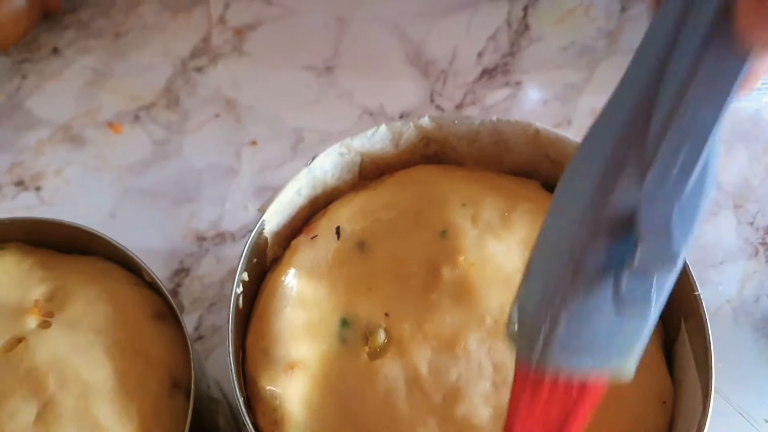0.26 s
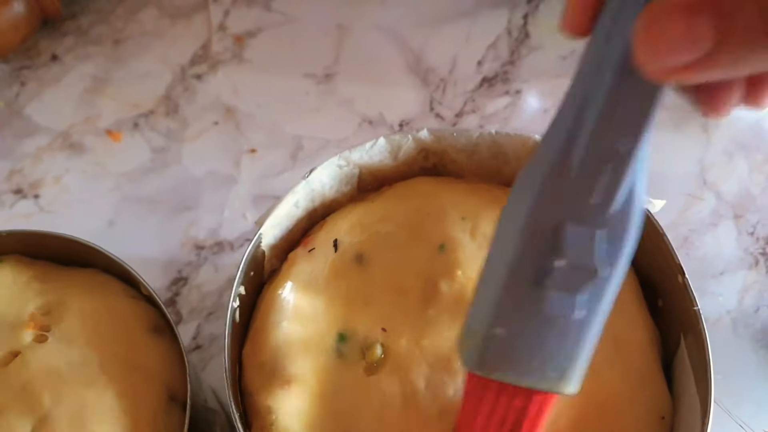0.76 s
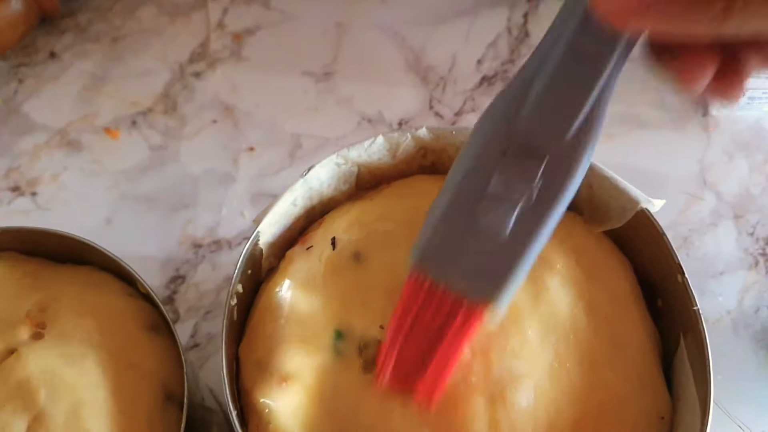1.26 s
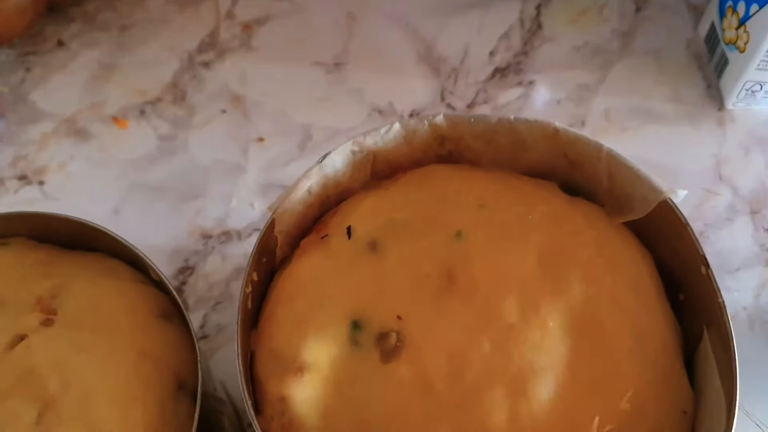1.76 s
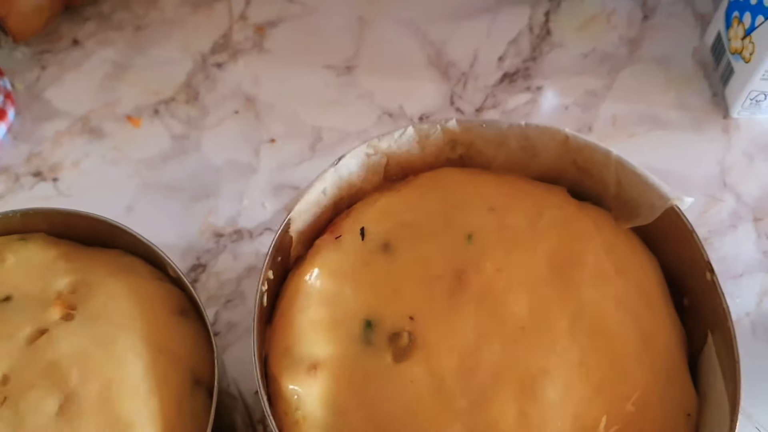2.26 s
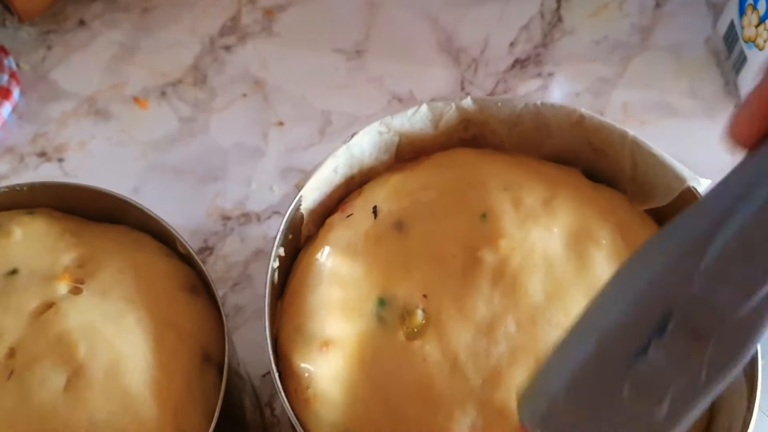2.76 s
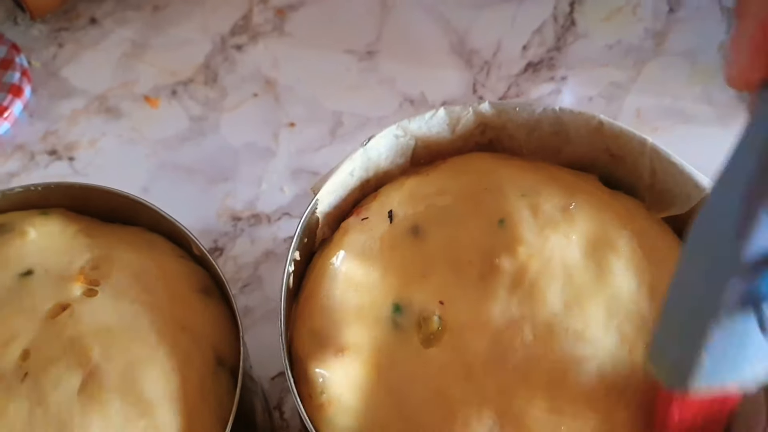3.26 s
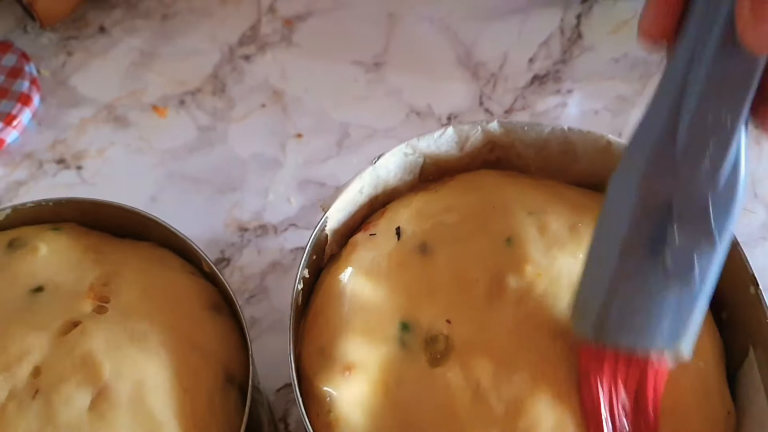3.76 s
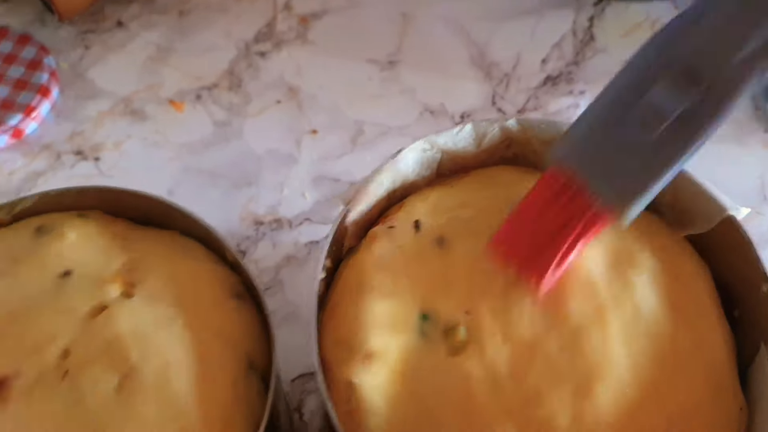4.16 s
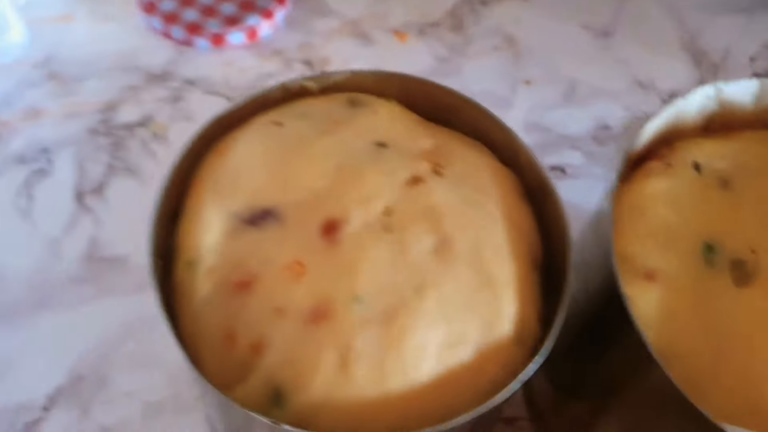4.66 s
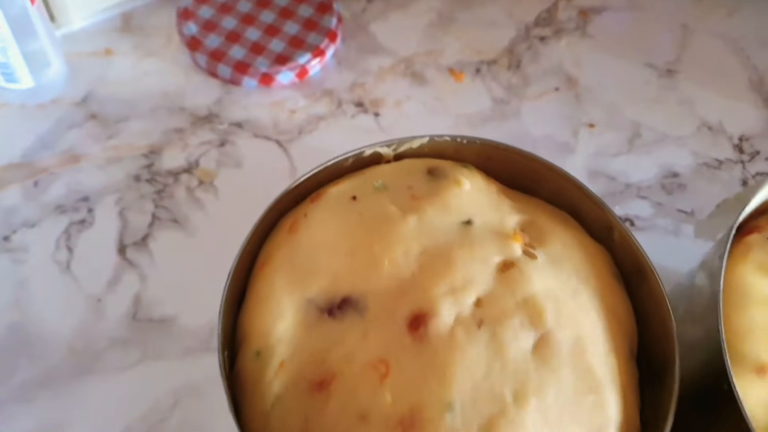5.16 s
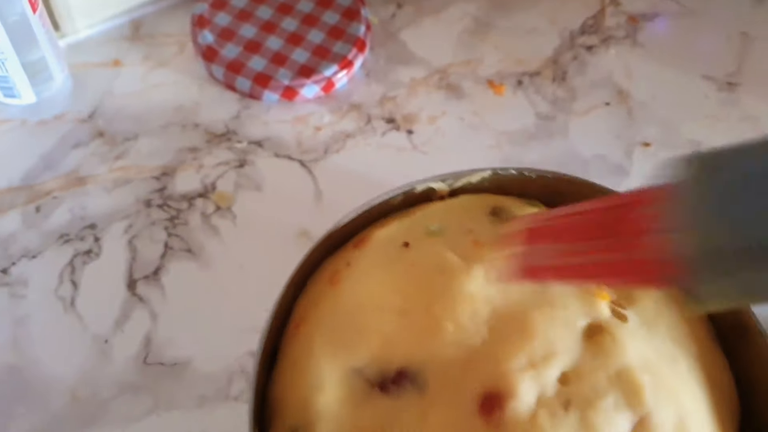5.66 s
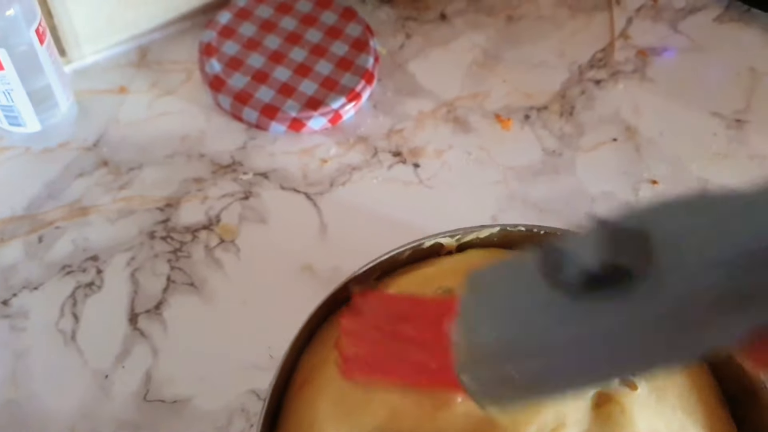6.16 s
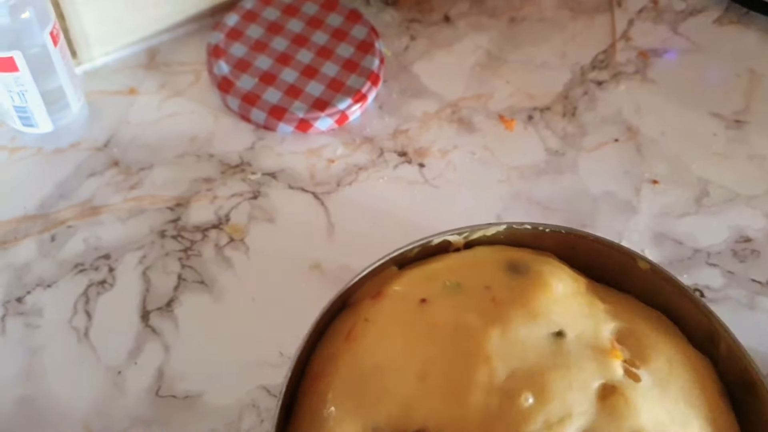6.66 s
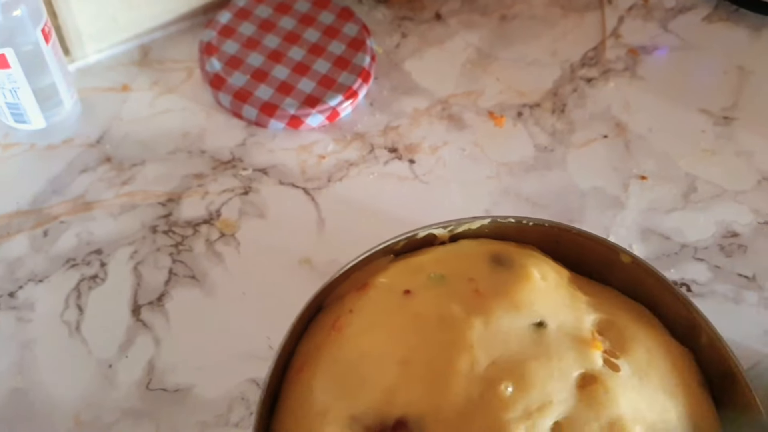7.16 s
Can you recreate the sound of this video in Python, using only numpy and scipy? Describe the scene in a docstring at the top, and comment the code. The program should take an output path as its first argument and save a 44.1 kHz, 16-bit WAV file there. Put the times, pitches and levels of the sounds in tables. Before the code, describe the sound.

A silicone brush swishes and pats in short uneven bursts over a droning kitchen hum, with sticky clicks and a single hard clink midway.

```python
"""In a small kitchen, a silicone brush glazes dough in paper-lined metal baking rings, close to a phone.
Rustling bristles are dense tiny noise clicks, shaped by pressure; taps wake the decaying tones of a ring.
The brush is dipped with wet ticks of resonant noise, and its handle knocks once against the glaze bowl.
Underneath, an appliance hums with sine tones over filtered noise; the hum and casing tones shift in level
once, as the phone moves over to the second ring."""
import sys
import numpy as np
from scipy import signal
from scipy.fft import rfft, irfft
from scipy.io import wavfile
from scipy.ndimage import uniform_filter1d

SR = 44100
rng = np.random.default_rng(int(sys.argv[2]) if len(sys.argv) > 2 else 0)


def store_wav(level_fs):
    """Save 16-bit WAV to argv[1]."""
    pcm = np.round(np.clip(np.atleast_2d(level_fs), -1, 1) * 32767)
    wavfile.write(sys.argv[1], SR, pcm.T.astype(np.int16))


N = 325899
T = np.arange(N) / SR  # time in s
HZ = np.maximum(np.fft.rfftfreq(N, 1 / SR), 1)  # frequencies of the spectrum
HALF_SECOND = SR // 2


def undb(db):
    """Turn decibels into gain."""
    return 10 ** (np.asarray(db) / 20)


def unit(x):
    """Scale to an rms (average strength) of 1."""
    return x / np.sqrt(np.mean(x ** 2))


def sides(pan_db):
    """Left and right gains for a left-minus-right level difference in dB."""
    return undb(np.array([[0.5], [-0.5]]) * pan_db)


def gains(points):
    """Draw a gain curve over all frequencies through (frequency [Hz], level [dB]) points."""
    hz, db = np.transpose(points)
    return undb(np.interp(np.log(HZ), np.log(hz), db))


def colour(x, gain):
    """Filter with a gain curve, without sounding ahead of time; white noise keeps its power."""
    # folding the cepstrum puts each click's energy after the click
    cepstrum = irfft(np.log(unit(gain)), N)
    cepstrum[1:N // 2] *= 2
    cepstrum[N // 2:] = 0
    response = np.exp(rfft(cepstrum))
    return irfft(rfft(x) * response, N)


def decay(t60):
    """Half a second of exponential decay, falling 60 dB in t60 seconds."""
    return np.exp(-np.log(1000) * T[:HALF_SECOND] / t60)


def add(out, s, x):
    """Mix a sound in at time s."""
    i = max(int(s * SR), 0)
    out[:, i:i + x.shape[-1]] += x[..., :N - i]


def burst(t60, tail_db, tail_t60):
    """A noisy crack and its scatter off the worktop, different at each microphone."""
    envelope = decay(t60) + undb(tail_db) * decay(tail_t60)
    return rng.standard_normal((2, HALF_SECOND)) * envelope


def mode(hz, t60, lag=0.00013):
    """One decaying tone of a struck object; it reaches the right microphone lag seconds later."""
    t = np.maximum(T[:HALF_SECOND] - np.array([[0], [lag]]), 0)
    return np.sin(2 * np.pi * hz * t) * decay(t60)


def ports(pair, apart_hz):
    """Two close microphones hear the same bass and, well above apart_hz, unrelated treble."""
    a, b = rfft(pair)
    alike = 1 / (1 + (HZ / apart_hz) ** 2)
    shared = a * np.sqrt((1 + alike) / 2)
    opposed = np.array([[1], [-1]]) * b * np.sqrt((1 - alike) / 2)
    return irfft(shared + opposed, N)


def resonance(x, hz, width_hz):
    """A resonance whose centre glides along the curve hz: shift it to zero, low-pass, shift back."""
    turn = np.exp(2j * np.pi * np.cumsum(hz) / SR)
    low_pass = signal.butter(2, width_hz / 2, fs=SR, output="sos")
    return unit((signal.sosfilt(low_pass, x / turn) * turn).real)


# appliance hum tones: (frequency [Hz], rms level before the overall trim [dB])
HUM_TONES = [(57.3, -54.5), (71.2, -52), (100.1, -48), (116, -68)]
# rumble colour: (frequency [Hz], relative level [dB per Hz])
RUMBLE_COLOUR = [(15, -50), (30, -15), (45, -12.5), (56, 2.5), (65, -5.5), (78, 1.5), (88, -7), (100, -9),
                 (125, -16.5), (200, -23), (320, -28), (600, -29), (1050, -46), (1500, -64.5)]
# hiss colour: (frequency [Hz], relative level [dB per Hz])
HISS_COLOUR = [(600, -3.5), (1500, 4.5), (3000, 5.5), (5000, -5), (6600, -9.5), (7300, -28.5), (11000, -12),
               (15000, -17), (16000, -28)]
# resonances of the appliance casing: (frequency [Hz], width [Hz], peak gain before the overall trim [dB])
CASING_RESONANCES = [(256, 38.3, 9), (358, 23, 1), (381.2, 6.6, 14), (380.4, 22, 12), (444.5, 15, 9),
                     (605, 27.5, 10.5), (698, 23, 7.5)]
# the phone moves over to the second ring
MOVE_S, MOVE_LENGTH_S = 4.23, 0.63
MOVE_CASING_DB, MOVE_HUM_DB = -3.5, 2  # changes of level


def background(rumble_db=-49, casing_db=-0.2, hum_db=-0.74, hiss_db=-78, waver_db=1.5):
    """Motor and mains tones over a rumble that rings the casing, and a faint, slowly wavering hiss."""
    moved = np.clip((T - MOVE_S) / MOVE_LENGTH_S, 0, 1)
    casing = sum((undb(db) - 1) / (1 + (2 * (HZ - hz) / width) ** 2)
                 for hz, width, db in CASING_RESONANCES)
    rumble = unit(colour(ports(rng.standard_normal((2, N)), 600), gains(RUMBLE_COLOUR)))
    casing_ring = irfft(rfft(rumble) * casing, N)
    rumble = rumble + casing_ring * undb(casing_db + MOVE_CASING_DB * moved)

    # root 2 turns an rms level into a sine's peak
    hum = sum(np.sqrt(2) * undb(db) * np.sin(2 * np.pi * (hz * T + rng.random()))
              for hz, db in HUM_TONES)
    hum = hum * undb(hum_db + MOVE_HUM_DB * moved)

    slow_noise = unit(uniform_filter1d(rng.standard_normal(N), size=6000))
    hiss = colour(rng.standard_normal((2, N)), gains(HISS_COLOUR)) * undb(waver_db * slow_noise)
    return undb(rumble_db) * rumble * sides(0.8) + hum * sides(2.4) + undb(hiss_db) * hiss * sides(6.1)


def slips(rate, spread_db):
    """Dense tiny releases of sticking bristles (rate per second), a few larger than the rest."""
    hit = rng.random(N) < rate / SR
    size = undb(spread_db * np.minimum(rng.exponential(size=N), 4))
    return unit(hit * size * rng.standard_normal((2, N)))


# brush strokes: (time of firmest pressure [s], swell [s], fade [s], level [dB],
# treble relative to the level [dB], left minus right [dB], swish pitch [Hz])
BRUSH_STROKES = [ (0.021, 0.076, 0.048, -46.5, -5, 15, 3000), (.085, 0.055, 0.091, -60, -6, 7, 2750),
                 (.556, 0.059, 0.05, -71.5, -12, 9, 2900), (.886, 0.042, 0.027, -72, -5, 14.5, 3600),
                 (.97, 0.052, 0.038, -80, -16, 16, 1920), (1.24, 0.13, .13, -79.5, -17, 16.5, 3400),
                 (1.637, 0.0057, 0.051, -60.5, -11.5, 6, 3040), (2.014, 0.011, 0.031, -60, -24, 6, 2820),
                 (2.062, 0.035, 0.022, -65.5, -24, 10, 2680), (2.693, 0.0081, 0.07, -54, -17, 12, 3320),
                 (2.748, 0.037, 0.07, -47, -12, 7.5, 3070), (2.817, 0.025, 0.016, -51, -7.5, 11, 3420),
                 (2.972, 0.036, 0.01, -52.5, -9.5, 12, 2860), (3.02, 0.12, 0.11, -63.5, -18, 9.5, 2320),
                 (3.439, 0.023, 0.045, -42.5, -19, 8.5, 3320), (4.575, 0.034, 0.11, -58.5, -3, 6.5, 2770),
                 (4.71, 0.12, 0.2, -69.5, -5.5, 11.5, 3000), (4.792, 0.014, 0.036, -61.5, -6, 7, 2840),
                 (4.978, .02, 0.046, -59, -7, 9.5, 2520), (5.738, 0.054, 0.078, -68, -33, 10.5, 2560),
                 (5.89, .11, 0.045, -70, -22, 17, 2550), (5.923, 0.026, 0.023, -49.5, -16.5, 9, 3030),
                 (6.122, 0.044, 0.23, -77, -12, 21, 2550), (6.286, 0.061, 0.087, -60.5, -12, 13.5, 2480),
                 (6.63, 0.094, .11, -54.5, -8.5, 13.5, 2860), (6.76, 0.043, 0.029, -62, -17, 15, 2620),
                 (6.888, 0.016, 0.04, -71, -32, 15.5, 2410), (6.995, 0.073, 0.13, -65, -19, 19.5, 2880),
                 (7.06, 0.1, 0.12, -57.5, -4.5, 11.5, 2930), (7.182, 0.048, 0.041, -55, -13.5, 10.5, 2550),
                 ]
# rustle of the bristles, also the colour of tap clicks: (frequency [Hz], relative level [dB per Hz])
RUSTLE_COLOUR = [(150, -27), (400, -13), (700, -4.5), (1050, -4.5), (1400, -6.5), (1900, -1.5), (3100, -1),
                 (4200, -3.5), (5200, -9), (6500, -7.5), (7500, -26), (16000, -37.5)]
# their treble sizzle, also the treble of tap clicks: (frequency [Hz], relative level [dB per Hz])
SIZZLE_COLOUR = [(6000, -24), (8000, -5), (9500, 3), (12500, 0.5), (16000, -12.5)]
# a stroke is this much weaker one swell before and one fade after its firmest moment;
# the power rounds its crest
STROKE_DROP_DB, STROKE_POWER = 20.5, 1.27
# level of a light stroke, and how far the swish's share sinks per dB of firmer pressure
LIGHT_DB, SWISH_MASKING = -69.5, 0.37


def strokes(swish_db=-4, swish_width_hz=680, flutter_db=2.0):
    """Pressure sets the level of the slips; the bent tuft swishes at a pitch, clearest in light strokes."""
    press, treble = np.zeros((2, 2, N))
    for s, swell_s, fade_s, db, treble_db, pan_db, _ in BRUSH_STROKES:
        away = np.maximum((s - T) / swell_s, (T - s) / fade_s)
        near = away < 4  # beyond this the stroke is silent
        gain = undb(db - STROKE_DROP_DB * away[near] ** STROKE_POWER) * sides(pan_db)
        # overlapping strokes add in power
        press[:, near] = np.hypot(press[:, near], gain)
        treble[:, near] = np.hypot(treble[:, near], gain * undb(treble_db) * sides(-8))
    both_sides_db = 10 * np.log10(press[0] * press[1] + 1e-18)
    firm_db = np.maximum(both_sides_db - LIGHT_DB, -10)

    # tufts catch and let go unevenly
    unevenness = unit(uniform_filter1d(rng.standard_normal(N), size=300))
    grains = slips(7000, 0.94) * undb(flutter_db * unevenness)
    rustle = colour(grains * press, gains(RUSTLE_COLOUR))
    sizzle = colour(grains * treble, gains(SIZZLE_COLOUR))
    s, *_, hz = np.transpose(BRUSH_STROKES)
    swish = resonance(grains, np.interp(T, s, hz), swish_width_hz)
    return rustle + sizzle + swish * press * undb(swish_db - SWISH_MASKING * firm_db)


# taps on a baking ring; soft contact gives a low centre: (time [s], click level before trim [dB],
# ring level before trim [dB], ring centre [Hz], left minus right [dB])
RING_TAPS = [ (.0074, -36, -49, 870, -3), (.0274, -38, -35, 905, 1), (.0425, -35.5, -38, 930, 2),
             (1.336, -58.5, -56, 1360, 9), (1.6306, -46.5, -50, 590, 6), (1.669, -42, -49, 1500, 5.5),
             (1.683, -51, -41, 1320, 5), (1.696, -60, -44.5, 1520, 7), (1.8237, -54.5, -41.5, 400, 5),
             (1.854, -38, -31.5, 1460, 3.5), (1.881, -50.5, -45, 1690, 5), (2.0083, -73, -43.5, 403, 2),
             (2.016, -68, -37.5, 440, 3.5), (2.074, -54, -45, 2450, 10), (2.6868, -56, -52, 3600, 16),
             (2.715, -33.5, -40.5, 1160, 10), (2.949, -42, -40, 686, 7), (2.961, -54, -52, 2480, 10),
             (3.433, -52, -45, 3300, 13), (4.5667, -46, -49.5, 2900, 7), (5.916, -45.5, -56, 3220, 6),
             (6.6662, -41, -65, 3200, 5), ]
# tones of a dough-filled ring: (frequency [Hz], relative level [dB], time to fall 60 dB [s])
RING_MODES = [(250, 9.5, 0.036), (332, 4.5, 0.094), (359, -1.5, 0.096), (423, -10.5, 0.15),
              (573, 0.5, 0.05), (713, 1, 0.065), (742, 0, 0.083), (915, -4, 0.067), (1058, -10.5, 0.083),
              (1447, -5, 0.047), (1530, -8, 0.036), (1874, -7, 0.054), (2110, -19, 0.023), (2450, 6, 0.018),
              (2834, 0, 0.038), (2960, -13, 0.035), (3047, 4, 0.04), (3760, -1, 0.031)]
# treble of a tap's click at a 2 kHz centre; softer contact is duller
TAP_TREBLE_DB, TAP_TREBLE_DB_PER_OCTAVE = -13, 5


def taps(click_db=-5, ring_db=-2, spread_octaves=0.39, contact_s=0.033):
    """Each tap clicks and wakes the tones around its centre; the dough damps them quickly."""
    click, snap, body = np.zeros((3, 2, N))
    for s, db, body_db, centre_hz, pan_db in RING_TAPS:
        # a soft, low tap stays in contact for longer
        softness = 2000 / centre_hz
        contact = contact_s * np.sqrt(softness)
        crack = burst(contact, -10, 0.13) * (1 - decay(contact / 4))
        crack = crack * undb(db + click_db) * sides(pan_db)
        add(click, s, crack)
        snap_db = TAP_TREBLE_DB - TAP_TREBLE_DB_PER_OCTAVE * np.log2(softness)
        add(snap, s, crack * undb(snap_db) * sides(-7))
        for hz, mode_db, t60 in RING_MODES:
            octaves_off = np.log2(hz / centre_hz)
            weight = rng.choice([-1, 1]) / (1 + (octaves_off / spread_octaves) ** 2)
            level = weight * undb(body_db + mode_db + ring_db)
            add(body, s, level * mode(hz, t60) * sides(pan_db))
    return colour(click, gains(RUSTLE_COLOUR)) + colour(snap, gains(SIZZLE_COLOUR)) + body


# wet ticks of the glaze: (time [s], level before trim [dB], pitch [Hz], left minus right [dB])
WET_TICKS = [(1.371, -52.5, 6500, 5), (2.9285, -60, 12900, 14), (2.974, -47, 10400, 4),
             (4.5379, -36.5, 10600, -8.5), (4.5408, -35, 6600, -1), (4.568, -40, 9200, 0),
             (4.965, -41, 12000, -1), (4.999, -34.5, 9560, -4), (5.003, -45, 11000, 4)]


def ticks(tick_db=1, sharpness=5, snap_db=-26):
    """Films of glaze snap between the bristles: a broad click and a short, high ring."""
    out = np.zeros((2, N))
    for s, db, hz, pan_db in WET_TICKS:
        snap = burst(0.011, -19.5, 0.13)
        film = signal.lfilter(*signal.iirpeak(hz, sharpness, fs=SR), snap)
        add(out, s, (film + undb(snap_db) * snap) * undb(db + tick_db) * sides(pan_db))
    return out


# first touch, blow and bounce on the bowl: (time [s], level before trim [dB])
BOWL_KNOCKS = [(5.2501, -37), (5.252, -23), (5.2567, -31.5)]
# tones of worktop and bowl:
# (frequency [Hz], relative level [dB], time to fall 60 dB [s], left minus right [dB])
THUD_MODES = [(186, -15, 0.14, 2), (248.7, -6, 0.17, 1), (352, -7.5, 0.18, 10), (396, -13.5, 0.079, -4),
              (442, -8, 0.176, -2), (698, 4, 0.079, -3), (754, -7.5, 0.096, -2.5), (1160, -14, 0.12, -6),
              (1208, -20, 0.072, -10.5), (1330, -4, 0.066, 17), (1380, -8.5, 0.076, 3),
              (1820, -9, 0.089, 6.5), (2640, -31, 0.098, -4), (2720, -14, .12, 12.5)]
# the bowl's bright clink:
# (frequency [Hz], relative level [dB], time to fall 60 dB [s], left minus right [dB])
CLINK_MODES = [(3302, -2.5, .28, 5), (3272, -21, .24, 4), (4440, -19, .06, 4), (7429, -31, .16, 3),
               (8875, -20, .11, 0), (10900, -25, .035, 0)]
# noise of the blow: (frequency [Hz], relative level [dB per Hz])
BLOW_COLOUR = [(120, -41), (250, 0), (700, 3), (1100, -3.5), (2200, -8), (3000, 1.5), (4500, -15),
               (7000, -23), (8000, -39.5), (11000, -29.5), (16000, -50)]


def knock(blow_db=-1, thud_db=-25, clink_db=-25):
    """The handle strikes the bowl and bounces; the worktop thuds and the bowl clinks."""
    blow, body = np.zeros((2, 2, N))
    for s, db in BOWL_KNOCKS:
        add(blow, s, undb(db + blow_db) * burst(0.027, -13.0, 0.28))
    first_touch_s = BOWL_KNOCKS[0][0]
    for modes, level_db in (THUD_MODES, thud_db), (CLINK_MODES, clink_db):
        # neighbouring tones start in opposite directions
        ring = sum(undb(db) * mode(hz, t60) * sides(pan_db) * (-1) ** k
                   for k, (hz, db, t60, pan_db) in enumerate(modes))
        add(body, first_touch_s, undb(level_db) * ring * (1 - decay(0.014)))
    return colour(ports(blow, 1000), gains(BLOW_COLOUR)) * sides(5.2) + body


def room(x, wet_db=-15, t60=0.3):
    """A short kitchen reverberation that builds up over the first few milliseconds."""
    tail = rng.standard_normal((2, HALF_SECOND)) * decay(t60) * (1 - decay(0.0098))
    tail /= np.sqrt(np.sum(tail ** 2) / 2)
    return x + undb(wet_db) * signal.fftconvolve(x, tail, axes=1)[:, :N]


def scene():
    """Brush and bowl echo in the kitchen, over the appliance's hum."""
    hum = background()
    return room(strokes() + taps() + ticks() + knock()) + hum


def record(dry):
    """The phone steeply cuts the treble above 15.8 kHz."""
    return signal.sosfilt(signal.ellip(10, 0.2, 70, 15800, fs=SR, output="sos"), dry)


dry = scene()
out = record(dry)
store_wav(out)
```